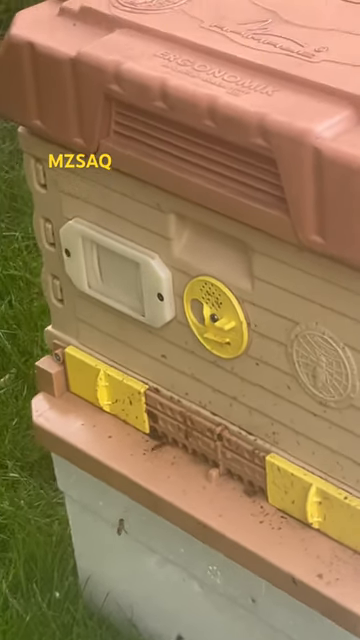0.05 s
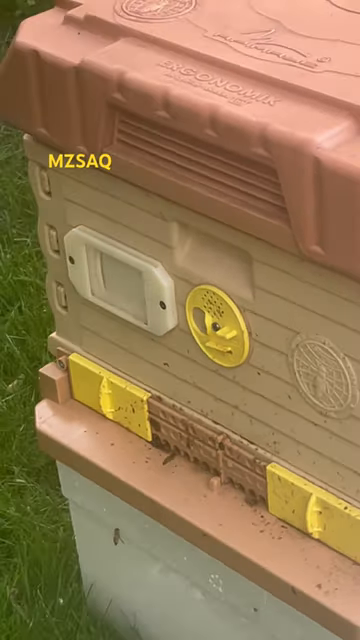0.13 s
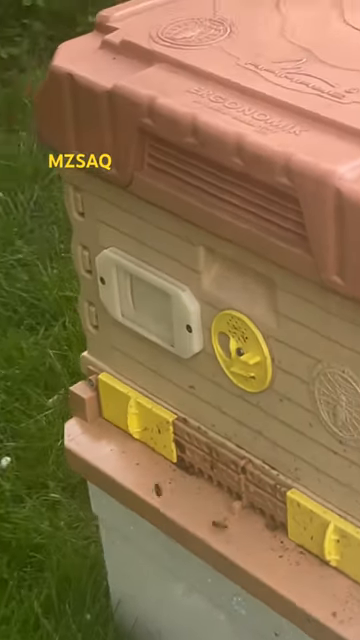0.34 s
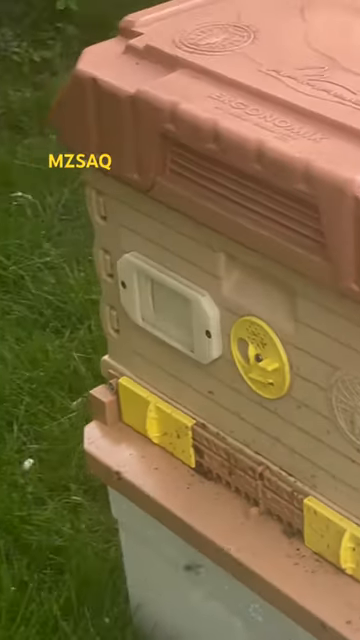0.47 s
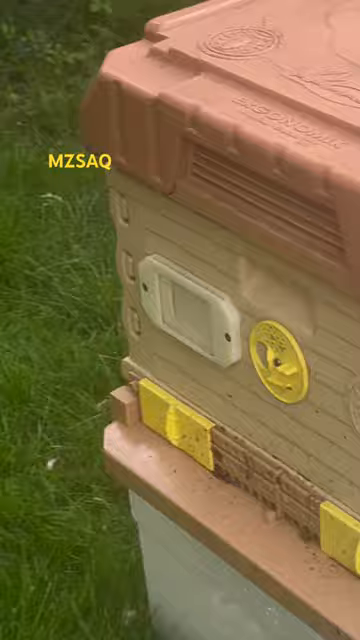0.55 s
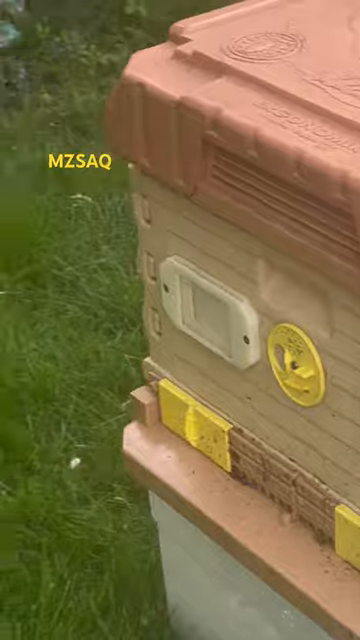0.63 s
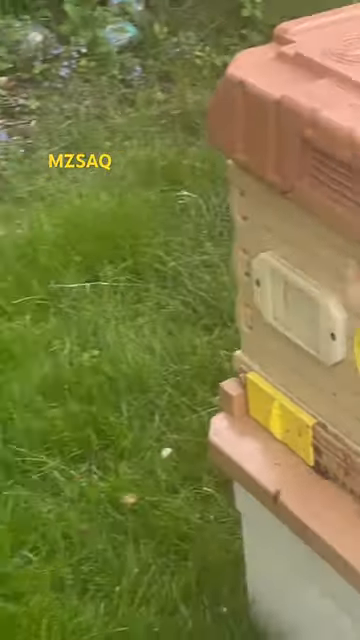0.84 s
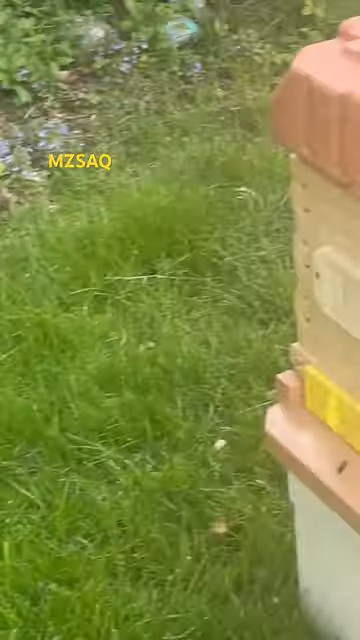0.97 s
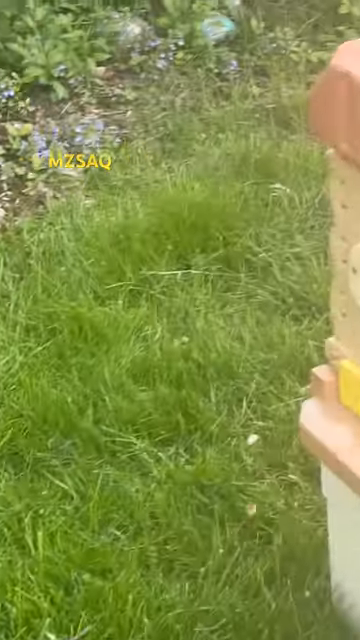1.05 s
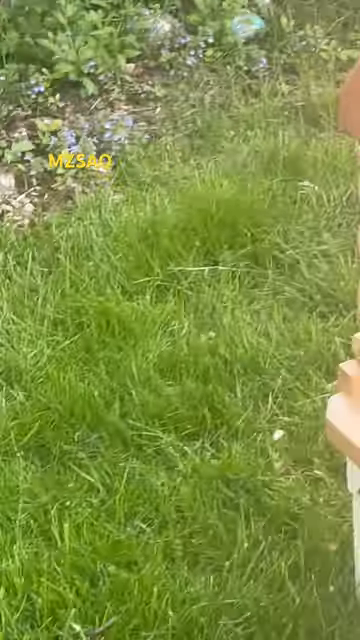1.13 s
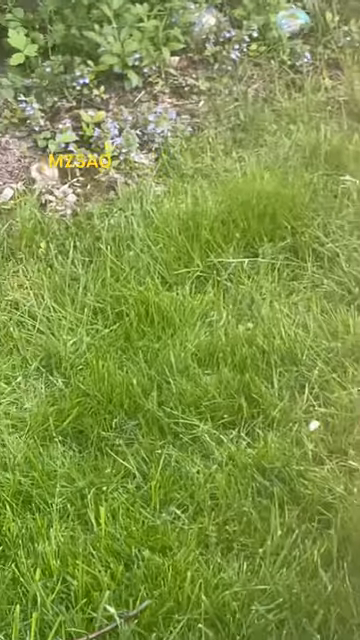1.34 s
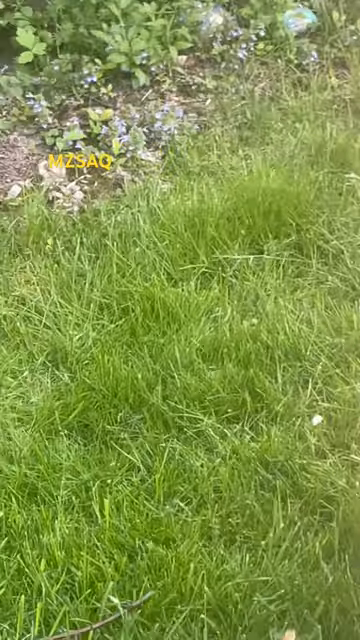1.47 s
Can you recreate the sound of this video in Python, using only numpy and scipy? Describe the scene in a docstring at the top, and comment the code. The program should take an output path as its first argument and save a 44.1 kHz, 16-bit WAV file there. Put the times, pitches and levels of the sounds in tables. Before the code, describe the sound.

A gust of wind buffets the microphone while honeybees buzz faintly at a hive.

```python
"""Honeybees on a lawn

Bees hum faintly at a hive, their beating wings swelling and fading as they fly by.
Early on, one gust of wind shakes the microphone with rumbles and thumps, then dies away.
Grass blades slip past each other and rustle softly, mostly in the second half.
A brief, high swish, then thin chirps and one held note sound over a steady background hiss."""
import sys
import numpy as np
from scipy import signal
from scipy.fft import rfft, irfft
from scipy.io import wavfile
from scipy.ndimage import uniform_filter1d

SR = 44100
rng = np.random.default_rng(int(sys.argv[2]) if len(sys.argv) > 2 else 0)


def to_wav(sig):
    """Store sig (one row per channel, or 1-D mono) as 16-bit WAV at the path in sys.argv[1].

    Samples outside -1..1 are clipped; the rate is SR.
    """
    pcm = np.clip(np.atleast_2d(sig), -1, 1) * 32767
    pcm = np.round(pcm).astype(np.int16)
    wavfile.write(sys.argv[1], SR, pcm.T)  # frames by channels


N = 66150
t = np.arange(N) / SR
freqs = np.fft.rfftfreq(N, 1 / SR)

# Passing bees (wingbeat [Hz], level [dB], pitch wander [share of wingbeat], left minus right [dB],
# time when nearest [s], half length [s])
BEE_PASSES = [(225.7, -67, 0.0069, -7, 0.28, 0.46), (226.5, -64, 0.0074, -3, 1.09, 0.29),
              (220.7, -67.5, 0.02, -7.5, 0.034, 0.32), (235.8, -64.5, .025, -4.5, .75, 0.12),
              (204, -68, 0.025, -5.5, 0.75, 0.18), (202.2, -65.5, 0.012, -5, 1.327, 0.096),
              (277.4, -76.5, 0.0235, -11, 0.795, .5), (137.2, -67, 0.013, -0.5, 1.406, 0.23)]
# Wing harmonics: tones at 1 to 5 times the wingbeat (relative level [dB])
WING_HARMONICS = [-3.5, -2, -8.5, -21.5, -14.5]
BEE_JITTER, BEE_DOPPLER = .011, 0.00601  # shares of the wingbeat: quick wobble, pitch fall on passing
BEE_SWELL_DB, BEE_SPREAD_RAD = 0.5, 0.098  # slow drifts in level and in left-right timing

# Tone of the wind on the microphone (frequency [Hz], relative level [dB])
WIND_SPECTRUM = [(20, -16), (33, -6.5), (55, 4.5), (100, -1), (135, -2.5), (180, -16), (240, -15),
                 (310, -27), (390, -27.5), (470, -53.5), (900, -62.5), (2000, -87)]
# The gust's deep rumble (time [s], level before trim [dB])
RUMBLE_LEVELS = [(0, -34.5), (.06, -53), (.087, -38), (.115, -47), (.152, -50), (.18, -36), (.218, -42),
                 (.243, -29), (.282, -29.5), (.326, -31), (.36, -27), (.39, -27), (.418, -29.5),
                 (.438, -33), (.465, -28.5), (.495, -39.5), (.527, -37.5), (.553, -54.5), (.595, -53),
                 (.625, -50), (.66, -57), (.8, -62), (1.07, -59.5), (1.15, -59), (1.25, -62.5), (1.5, -68)]
# The gust's higher flutter (time [s], level before trim [dB])
FLUTTER_LEVELS = [(0, -49.5), (.1, -63), (.14, -51.5), (.2, -75), (.245, -39), (.295, -43.5), (.335, -37.5),
                  (.38, -40), (.415, -33), (.45, -57.5), (.49, -53.5), (.55, -55), (.61, -56), (.67, -73.5),
                  (1.06, -76), (1.11, -57), (1.19, -67), (1.5, -56)]
RUMBLE_TRIM_DB, FLUTTER_TRIM_DB, FLUTTER_ABOVE_HZ = 1.5, -0.5, 137
# Single eddies, or whirls of air, hitting the microphone
# (peak time [s], half length [s], pitch [Hz], level [dB])
EDDY_THUMPS = [(0.22, .005, 304, -47), (.231, 0.0088, 168.5, -37), (.266, 0.0082, 199.5, -34),
               (0.28, .013, 81.3, -25.5), (0.328, 0.0041, 281, -38), (.349, 0.0065, 386, -47),
               (.362, 0.0031, 214, -34), (.403, 0.0045, 168.5, -26), (.41, 0.0071, 92, -18.5),
               (.431, 0.0036, 233, -29), (.463, .008, 161, -47.5), (.503, 0.0033, 183, -41),
               (0.519, 0.012, 70.7, -37), (0.594, 0.011, 76.8, -38), (1.106, .013, 76, -42.5)]
# Puffs of air (peak time [s], half length [s], relative level [dB], upper edge [Hz])
AIR_PUFFS = [(0, 0.015, -57, 100), (0.045, 0.025, -53.5, 530), (0.182, 0.016, -48, 192),
             (0.261, 0.038, -45.5, 139), (0.329, 0.034, -38, 195), (0.416, 0.018, -42, 127.7),
             (0.499, 0.031, -55, 119), (0.575, 0.015, -57, 130)]
PUFF_LOW_HZ, PUFF_SLOPE, PUFF_MID_DB, PUFF_SIDE_DB = 68, 2.77, -12, 2

# Swishes of grass (peak time [s], half length [s], level before tilt [dB], tilt [dB per octave])
GRASS_SWISHES = [(0.157, 0.033, -66, 3.5), (0.738, 0.024, -69, -8), (1.054, 0.046, -63.5, 5),
                 (1.127, 0.033, -62, -1.5), (1.211, 0.058, -60.5, 0), (1.292, 0.039, -62.5, 0.5),
                 (1.347, 0.022, -61, 2.5), (1.401, 0.024, -62.5, -1)]
# Spectrum of the rustling hiss; near 10.5 kHz the middle channel falls almost silent. "Middle" is what left and
# right share; "side" is how they differ. (frequency [Hz], relative middle level [dB], relative side level [dB])
RUSTLE_SPECTRUM = [(303, -11, -25), (910, -9, -7), (1760, 10, -1), (3080, 6, -4), (4470, 7.5, -37.5),
                   (6260, 1.5, 4), (8820, -4, 1), (10500, -54.5, -6.5), (15200, -10, -7)]
TICKS_PER_S, TICK_SCATTER_DB, TICK_SHARE, GRASS_PIVOT_HZ = 3500, 2, 0.3, 3440

# A brief, high swish, then thin chirps and one held note (peak time [s], half length [s],
# pitch [Hz], glide [Hz per s], blur [Hz], middle level [dB], side minus middle [dB])
HIGH_SOUNDS = [(0.126, .022, 7950, -14000, 580, -67.5, 7), (0.574, .016, 3030, 12000, 170, -68, -12),
               (0.665, .022, 3320, 6998.5, 170, -68, -14), (0.806, 0.42, 2466, 0.5, 185, -70.5, -21),
               (1.35, 0.02, 4640, -9000, 714, -60, -43), (1.359, 0.016, 3505, 3995, 90, -60.5, -23),
               (1.375, .011, 3280, -6000, 250, -59.5, -13), (1.49, 0.02, 5210, -2000, 330, -62, -18)]

# Spectrum of the steady background hiss; near 11 kHz the middle channel falls almost silent (frequency [Hz],
# relative middle level [dB], relative side level [dB])
HISS_SPECTRUM = [(25.4, -11, -19.5), (46, 8, -16.5), (75, 9.5, -9.5), (135, -3, -22), (238, 1, -20),
                 (340, 2, -19.5), (492, 0, -8.5), (607, -4.5, -9), (850, -5.5, -9), (1390, -9.5, -15.5),
                 (2030, -9, -25), (2740, -10.5, -12.5), (4130, -12.5, -54), (5570, -15.5, -19),
                 (6800, -20, -19), (8830, -25.5, -19.5), (10700, -63.5, -23.5), (15240, -27, -29)]
HISS_DB, HISS_FLICKER_DB = -58, 0.78


def bees():
    """Each bee beats its wings at its own wavering rate and swells and fades as it flies by."""
    out = np.zeros((2, N))
    gains = undb(WING_HARMONICS) / np.sqrt(np.sum(undb(WING_HARMONICS) ** 2) / 2)
    for hz, db, wander, pan_db, at, half in BEE_PASSES:
        passing = BEE_DOPPLER * np.tanh((t - at) / half)  # higher coming, lower going
        wingbeat_hz = hz * (1 + wander * drift(3.11) + BEE_JITTER * drift(45) - passing)
        phase = 2 * np.pi * np.cumsum(wingbeat_hz) / SR + stereo(0, BEE_SPREAD_RAD * drift(0.59))
        hum = sum(gain * undb(4.3 * drift(19)) * np.sin(k * phase + rng.uniform(0, 2 * np.pi))
                  for k, gain in enumerate(gains, 1))  # each harmonic flickers on its own
        balance_db = stereo(0, np.array([pan_db / 2]))
        out += hum * swell(at, half) * undb(db + BEE_SWELL_DB * drift(1.6) + balance_db)
    return out


def gust():
    """The gust shakes left and right alike: large eddies rumble, small ones flutter on top."""
    swirl = turbulence()
    keep_highs = 1 - 1 / (1 + (freqs / FLUTTER_ABOVE_HZ) ** 6)
    flutter = shaped(swirl, keep_highs)
    rumble_db = np.interp(t, *np.array(RUMBLE_LEVELS).T) + RUMBLE_TRIM_DB
    flutter_db = np.interp(t, *np.array(FLUTTER_LEVELS).T) + FLUTTER_TRIM_DB
    return undb(rumble_db) * unit(swirl - flutter) + undb(flutter_db) * unit(flutter)


def turbulence():
    """Rumbling swings of air pressure, kept fairly even in strength."""
    rumble = shaped(noise(), tone_curve(WIND_SPECTRUM))
    power = abs(signal.hilbert(rumble)) ** 2
    smooth_power = uniform_filter1d(uniform_filter1d(power, size=900), size=900)
    return unit(rumble / np.sqrt(smooth_power))


def thumps():
    """Each eddy rocks the air at the microphone for a few cycles: a dull thump."""
    out = np.zeros(N)
    for at, half, hz, db in EDDY_THUMPS:
        phase = 2 * np.pi * hz * (t - at) + rng.uniform(0, 2 * np.pi)
        out += np.sqrt(2) * undb(db) * swell(at, half) * np.sin(phase)
    return out


def puffs():
    """Short, low swirls of air that push differently on the left and the right."""
    out = np.zeros((2, N))
    for at, half, db, edge_hz in AIR_PUFFS:
        low_cut = freqs / np.hypot(freqs, PUFF_LOW_HZ)
        band = low_cut / np.sqrt(1 + (freqs / edge_hz) ** (2 * PUFF_SLOPE))
        mid, side = (unit(shaped(noise(), band)) for _ in range(2))
        out += undb(db) * swell(at, half) * stereo(undb(PUFF_MID_DB) * mid, undb(PUFF_SIDE_DB) * side)
    return out


def grass():
    """Grass rustles in soft swishes; an upward tilt makes one brighter, a downward tilt duller."""
    octaves = np.log2(np.clip(freqs, 1000, 8000) / GRASS_PIVOT_HZ)
    out = np.zeros((2, N))
    for at, half, db, tilt in GRASS_SWISHES:
        rustle = shaped(widen(RUSTLE_SPECTRUM, blades), undb(tilt * octaves))
        out += undb(db) * swell(at, half) * rustle
    return out * undb(0.85 * drift(25))  # the level flickers slightly


def blades():
    """Tiny ticks of grass blades slipping past each other, in a smooth hiss."""
    slips = (rng.random(N) < TICKS_PER_S / SR) * np.sign(noise())
    ticks = slips * undb(TICK_SCATTER_DB * np.minimum(rng.exponential(size=N), 5))
    return np.sqrt(TICK_SHARE) * unit(ticks) + np.sqrt(1 - TICK_SHARE) * noise()


def high_sounds():
    """Narrow bands of noise make a brief, high swish, then thin chirps and one held note."""
    out = np.zeros((2, N))
    for at, half, hz, glide, blur, db, side_db in HIGH_SOUNDS:
        pitch_hz = hz + glide * np.clip(t - at, -2 * half, 2 * half)
        phase = 2 * np.pi * np.cumsum(pitch_hz) / SR
        mid, side = (unit(drift(blur) * np.cos(phase) + drift(blur) * np.sin(phase)) for _ in range(2))
        out += undb(db) * swell(at, half) * stereo(mid, undb(side_db) * side)
    return out


def background():
    """The garden and the crowded hive blend into a steady hiss."""
    return widen(HISS_SPECTRUM, noise) * undb(HISS_DB + HISS_FLICKER_DB * drift(16))


def undb(db):
    """Turn decibels into a multiplier."""
    return 10 ** (np.asarray(db) / 20)


def unit(x):
    """Scale to an average strength (rms) of 1."""
    return x / np.sqrt(np.mean(x ** 2))


def noise():
    """White noise: a plain hiss."""
    return rng.standard_normal(N)


def shaped(sound, gains):
    """Turn each frequency up or down by its gain."""
    return irfft(rfft(sound) * gains, N)


def drift(rate):
    """A smooth random wobble of strength 1, changing about rate times a second."""
    return unit(shaped(noise(), np.exp(-.5 * (freqs / rate) ** 2) * (freqs > 0)))


def swell(at, half):
    """A rounded rise and fall, at about 60% one half length from its peak."""
    return np.exp(-.5 * ((t - at) / half) ** 2)


def tone_curve(table, column=1):
    """Join a spectrum's points into a gain for every frequency."""
    table = np.array(table)
    return undb(np.interp(np.log(freqs + 1), np.log(table[:, 0]), table[:, column]))


def stereo(mid, side):
    """Turn middle and side into left and right."""
    return np.array([mid + side, mid - side])


def widen(table, source):
    """Make stereo from two runs of a source: a middle of strength 1 and a side."""
    mid, side = (shaped(source(), tone_curve(table, column)) for column in (1, 2))
    return stereo(mid, side) / np.std(mid)


def scene():
    """Everything heard beside the hive."""
    return gust() + thumps() + puffs() + bees() + background() + grass() + high_sounds()


def record(dry):
    """The sound fades in quickly and loses its deepest bass and highest treble."""
    fade_in = np.sin(np.pi / 2 * np.minimum(t / .004, 1)) ** 2
    bass_cut = signal.butter(2, 22, "high", fs=SR, output="sos")  # below 22 Hz
    treble_cut = signal.ellip(8, .2, 70, 15750, fs=SR, output="sos")  # above 15750 Hz
    return signal.sosfilt(treble_cut, signal.sosfilt(bass_cut, dry * fade_in))


dry = scene()
out = record(dry)
to_wav(out)
```